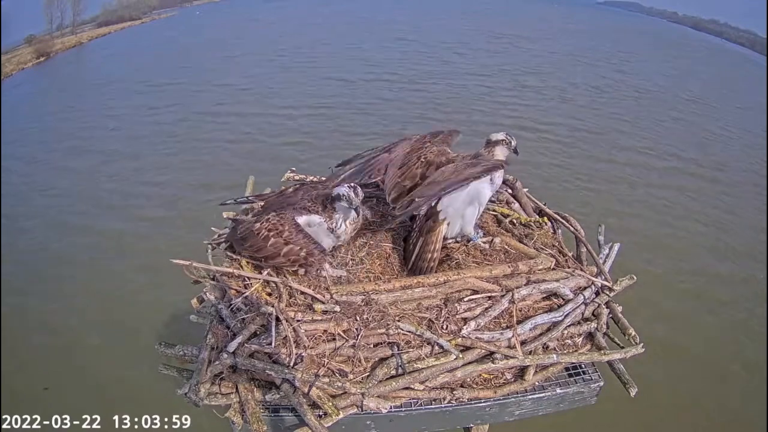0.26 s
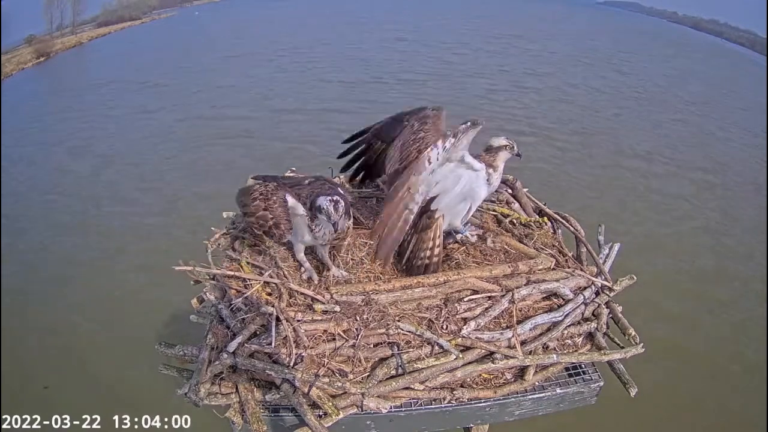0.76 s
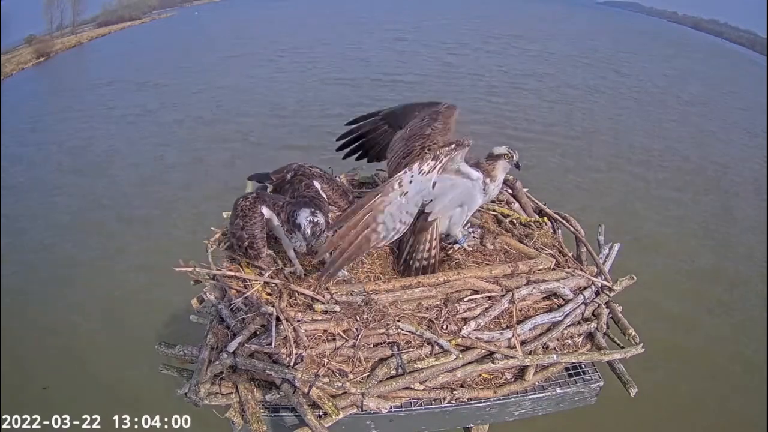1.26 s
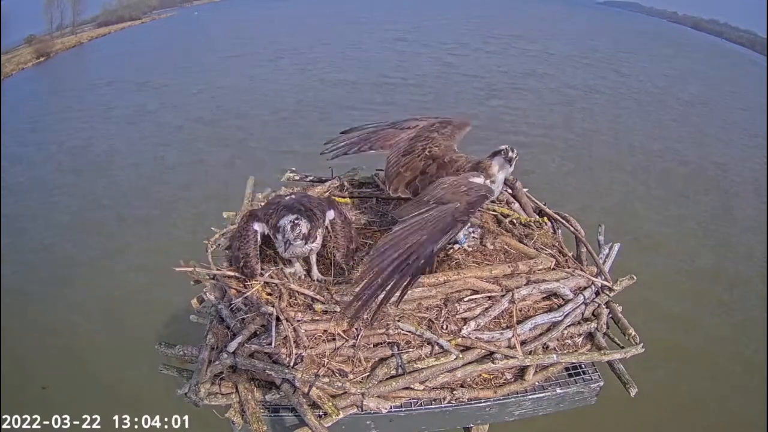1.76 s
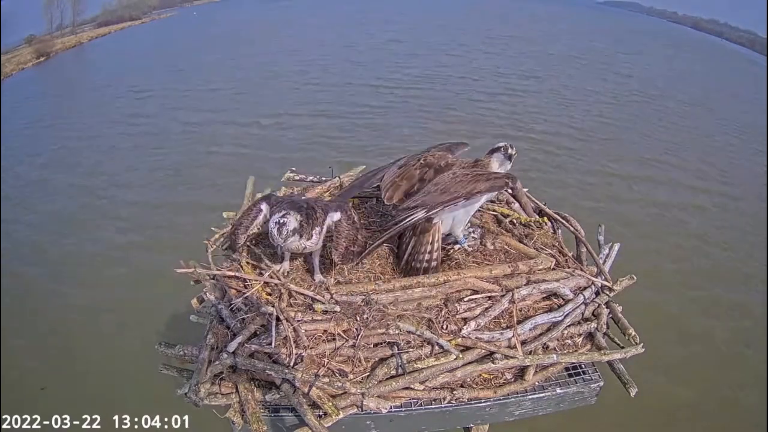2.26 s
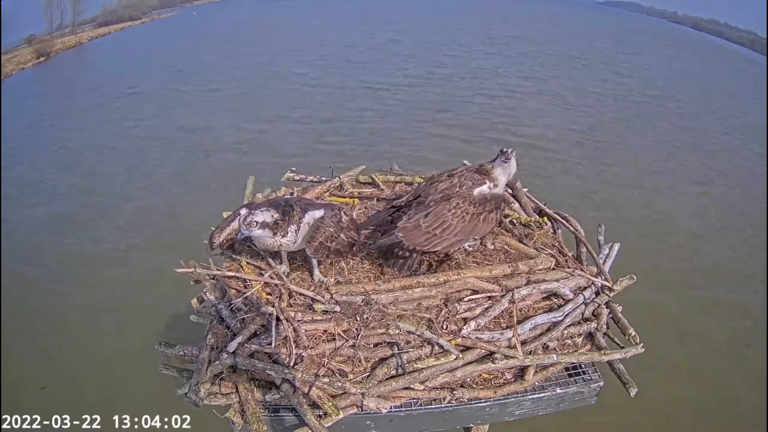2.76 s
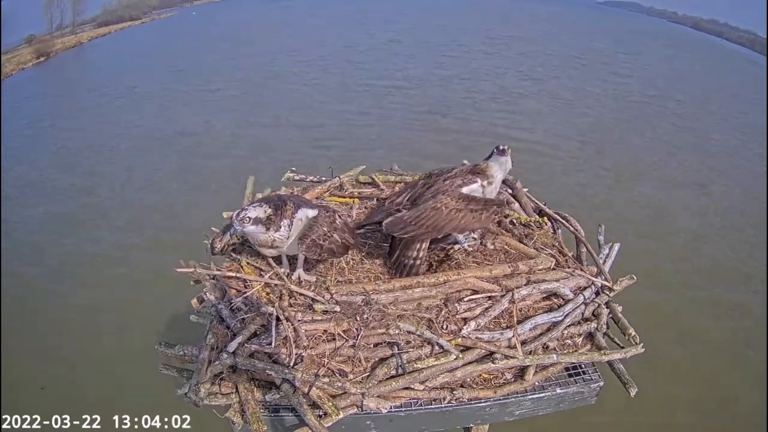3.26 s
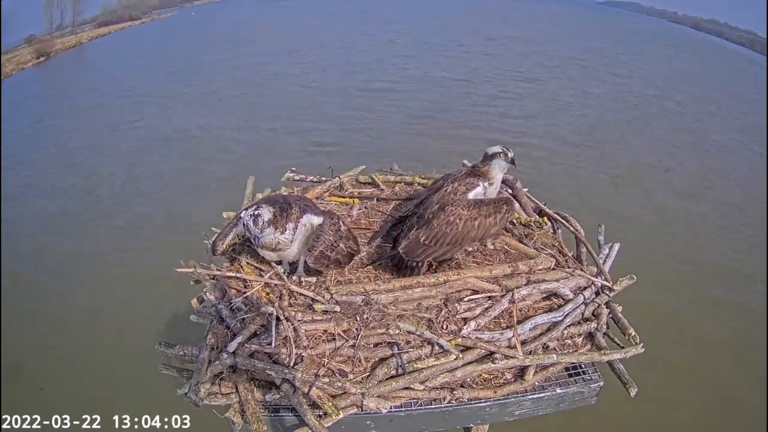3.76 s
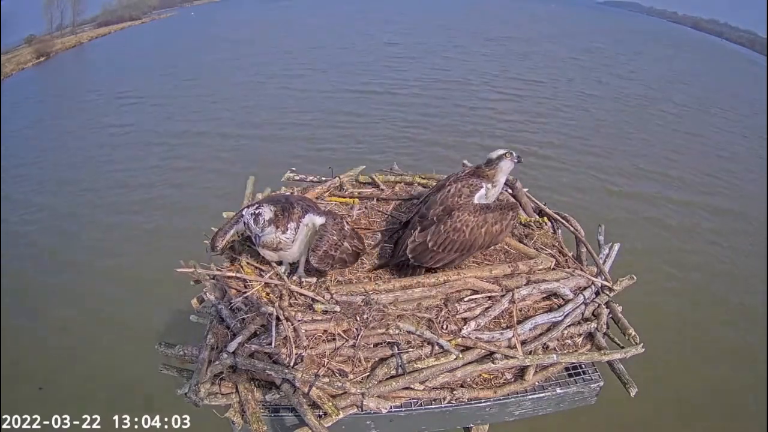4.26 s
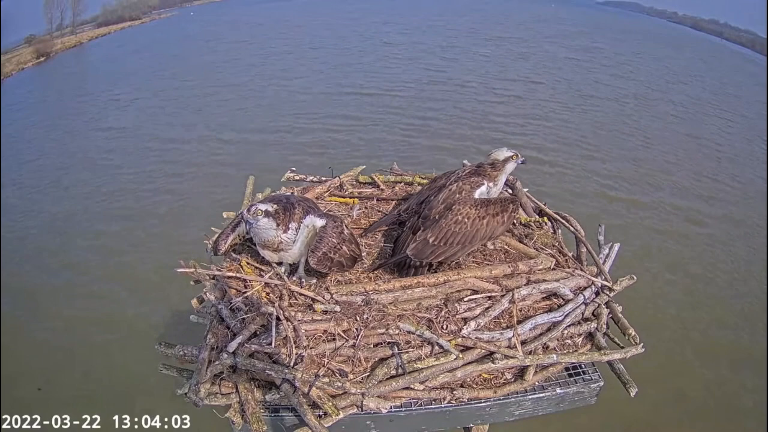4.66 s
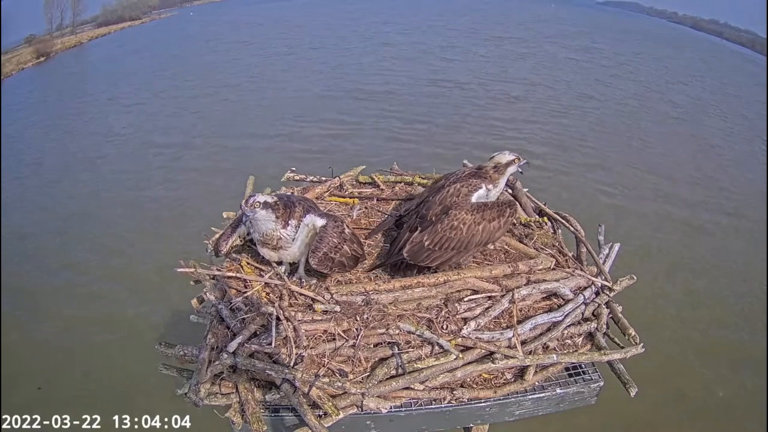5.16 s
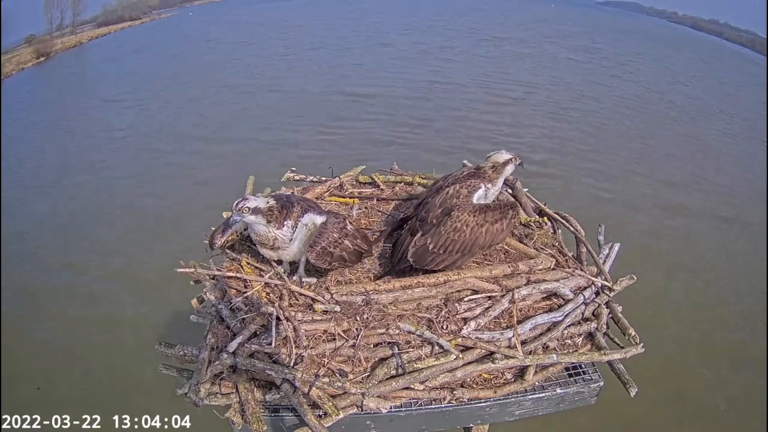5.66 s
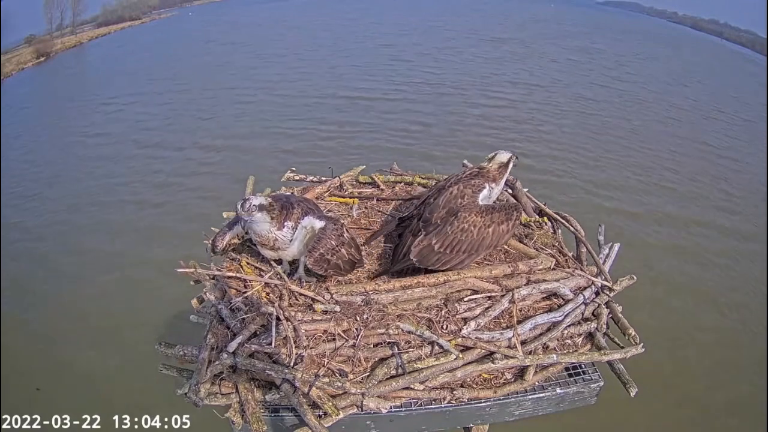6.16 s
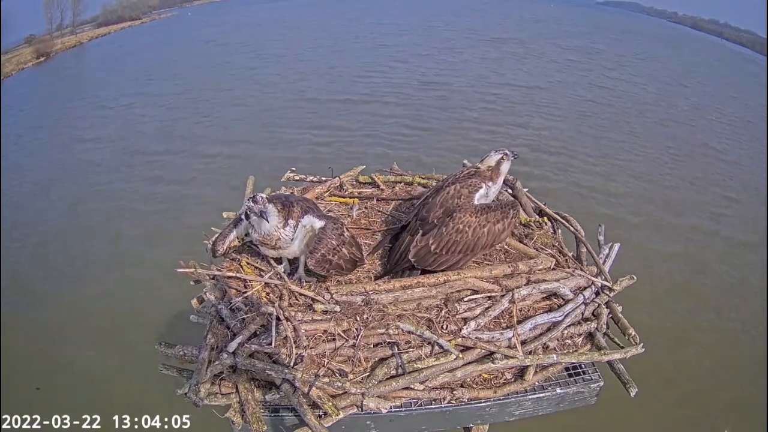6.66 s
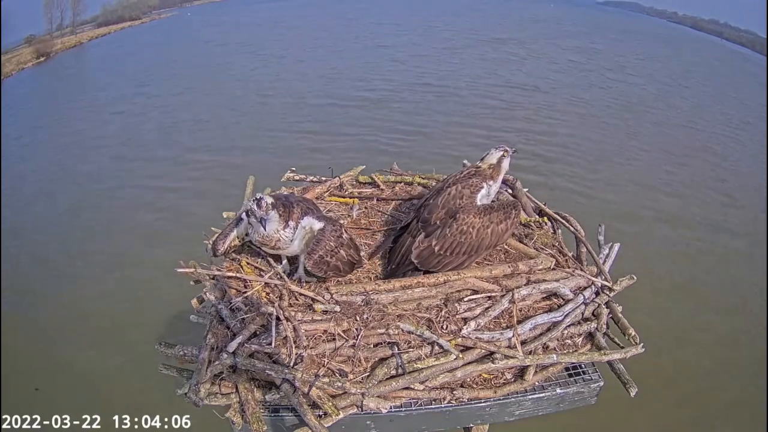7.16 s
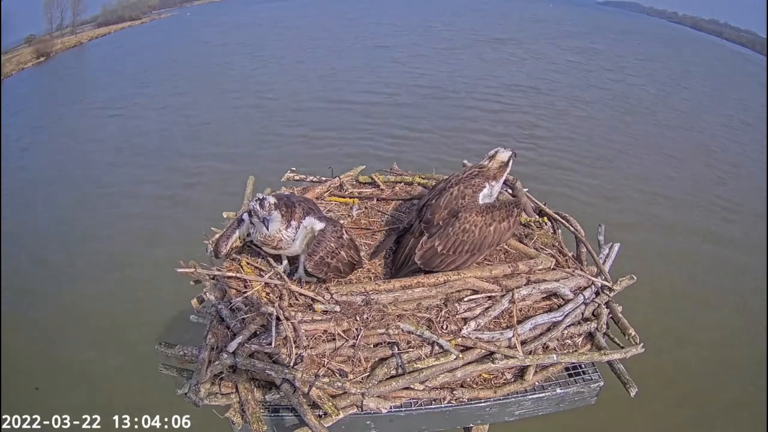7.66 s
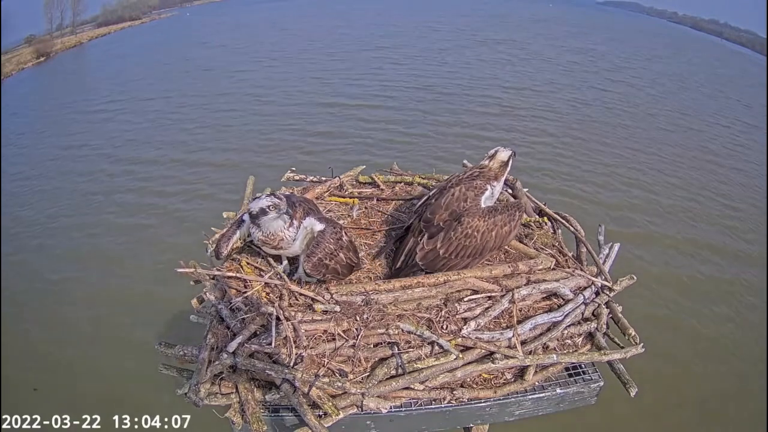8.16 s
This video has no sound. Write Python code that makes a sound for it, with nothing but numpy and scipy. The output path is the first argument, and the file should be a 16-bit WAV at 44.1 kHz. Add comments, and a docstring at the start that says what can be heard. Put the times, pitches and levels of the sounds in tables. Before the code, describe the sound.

Outdoors on a nest over open water, an osprey utters quick squeaky chips as wings brush and sticks knock. Short piercing calls follow, alternating falling yelps with flat whistles, each with a slight echo from nest and shore. Wind thuds directly on the close microphone throughout. Distant traffic, faint small birds and a steady electronic whine lie underneath.

```python
"""An osprey on a stick nest above a lake gives short chips, loud falling yelps and level whistles.
Its voice is built from gliding tones with an octave and rasp; nest, twigs, water and shore echo it.
Feathers brush and sticks click as bursts of noise; small birds far off are thin gliding tones.
Layered noise makes the wind and gusts at the microphone, over a distant traffic hush.
A faint electrical whine of steady tones runs throughout; anything beyond full scale clips."""
import sys
import numpy as np
from scipy import signal
from scipy.fft import rfft, irfft, next_fast_len
from scipy.io import wavfile
from scipy.ndimage import uniform_filter1d

SR = 44100
rng = np.random.default_rng(int(sys.argv[2]) if len(sys.argv) > 2 else 0)


def wav_out(sig):
    """Save sig, one row per channel (or a flat mono array), as 16-bit PCM at SR to the path in sys.argv[1]."""
    wavfile.write(sys.argv[1], SR, np.round(np.clip(np.atleast_2d(sig).T, -1, 1) * 32767).astype(np.int16))


N = 371322
T = np.arange(N) / SR  # time in seconds

# Wind eddies from large to small. Each row: pitch in Hz, relative level in dB,
# share from 0 to 1 that follows the small-eddy level.
EDDIES = [(15.2, 1.5, 0), (32, -0.5, 0), (64.03, 3.5, 0.42), (123.4, 2, 0.79), (235.6, -5.5, 0.96),
          (491, -19, 0.94), (1050, -32, 1), (1982, -40, 0.92)]
# Rumble of the large eddies, before the wind's trim. Each row: time in seconds, level in dB.
RUMBLE = [(0.03, -22.5), (0.8, -20.5), (0.97, -25.5), (2.2, -20.5), (2.95, -16.5), (3.7, -16),
          (4.41, -19.5), (4.9, -20.5), (5.2, -14), (5.48, -19), (5.8, -13), (6.0, -20.5), (6.2, -23.5),
          (6.35, -14), (6.6, -21.5), (7.15, -28.5), (7.38, -29.5), (7.5, -22), (7.8, -21), (8.2, -17.5),
          (8.4, -28)]
# Strength of the small eddies, before the wind's trim. Each row: time in seconds, level in dB.
TURBULENCE = [(0.04, -49.5), (0.53, -45), (1.99, -43.5), (2.39, -37.5), (2.9, -32), (3.53, -35),
              (3.72, -32.5), (4.21, -39), (4.58, -35.5), (5.32, -40.5), (5.7, -32), (5.82, -49),
              (6.09, -52), (6.47, -44), (7.26, -56.5), (8.4, -44.5)]
# Gusts. Each row: middle in seconds, length in seconds, level of their small eddies in dB.
GUSTS = [(2.78, 0.113, -30.5), (3.72, 0.078, -27.5), (4.55, 0.059, -29.5), (5.25, 0.1, -29.5),
         (5.345, 0.052, -23), (5.6, 0.27, -26.5), (5.79, 0.074, -25), (6.37, 0.1, -34),
         (6.505, 0.073, -31.5), (8.125, 0.048, -28.5), (8.26, 0.14, -36)]
# Colour of the distant road. Each row: frequency in Hz, relative level in dB per Hz.
TRAFFIC = [(200, -15.5), (500, -6), (680, -7), (880, 1.5), (1080, -3.5), (1330, -10), (1600, -8),
           (2100, -19), (2700, -24), (3500, -28.5), (4500, -31.5), (6700, -34.5), (7700, -51.5),
           (12800, -46), (14000, -68.5)]
# Swell of the road, before its flicker. Each row: time in seconds, level in dB.
TRAFFIC_LEVEL = [(0, -55), (1.1, -52.5), (2.3, -53), (5.8, -53), (6.4, -50), (6.75, -53.5), (7.15, -50.5),
                 (7.55, -52), (8.42, -53.5)]
# Tyres singing far away. Each row: time in seconds, pitch in Hz, level in dB.
TYRES = [(6.6, 991, -75.5), (6.9, 1023, -55.5), (7.15, 1092, -57), (7.35, 1170, -57), (7.7, 1100, -76)]
# Electrical whine. Each row: pitch in Hz, peak level in dB.
WHINE = [(915, -70), (1526, -65), (1930, -67.5), (2338, -66.5), (2434, -70), (2638, -74.5), (2837, -81),
         (3445, -76)]
# Colour of the feathers. Each row: frequency in Hz, relative level in dB per Hz.
FEATHER_COLOUR = [(800, -5.5), (2000, 1), (3000, -4.5), (4000, 0), (4800, -5), (6300, -2.5), (7100, -5.5),
                  (7900, -34)]
# Wing strokes, and one faint, long hush of noise at 3.25 s. Each row: middle in seconds, # length in seconds,
# level in dB.
WING_STROKES = [(0.44, .06, -66), (0.858, 0.019, -65), (2.003, 0.05, -49.5), (2.09, 0.046, -63),
                (2.25, 0.045, -64.5), (3.25, .3, -68.5)]
# Short chips, levels before colouring and the call trim. Each row: start in seconds, length in seconds,
# pitch in Hz, opening overshoot in Hz, level in dB, octave in dB relative to the note,
# opening squeak in dB, lead of the squeak in seconds, growth of the octave in dB, sag in Hz per second.
CHIPS = [(0.2226, 0.022, 2904, -250, -23.5, -5.5, -28.5, 0.0045, 16, 14000),
         (1.1362, 0.018, 2700, -250, -21.5, -2.5, -30, 0.0024, -5.5, 10500),
         (1.4345, 0.025, 2960, 117, -21, -2, -24, 0.0074, 13, 15000),
         (1.7306, 0.024, 2865, 121.5, -23, .5, -22, .006, 9.5, 13950),
         (7.172, 0.027, 2087, 399, -29, -36, -72, 0.0015, -35, 10550)]
# Falling yelps, levels before colouring and the call trim. Each row: start in seconds, length in seconds,
# lowest pitch in Hz, closing pitch in Hz, level in dB, fading in dB per second,
# octave in dB relative, rasp in dB relative, lag of the nest's reflection in seconds.
YELPS = [(2.7398, 0.099, 2515, 2894, -3.5, 145, -10.5, -30.5, .00211),
         (5.174, 0.099, 2676, 4770, -12, 106, -12.5, -29, .00262)]
# Level whistles, levels before colouring and the call trim. Each row: start in seconds, length in seconds,
# top pitch in Hz, level in dB, octave in dB relative, opening squeak in dB,
# rasp in dB relative, in-between lines in dB relative.
WHISTLES = [(4.0312, 0.1, 2968, -16, -5, -25, -28, -36.5), (6.337, 0.095, 3155, -17.5, -8, -32, -42, -33.5)]
# Peaks and dips each partial glides through on its way to the microphone.
# Each row: frequency in Hz, gain in dB.
CALL_COLOUR = [(1900, -6), (2540, 0), (2720, -0.5), (2950, 4.5), (3130, -3), (3550, 8), (3730, 2),
               (3950, 5.5), (4400, 0), (4950, -10), (5250, -2), (5500, -4), (5780, 1.5), (5930, -12),
               (6270, 9), (7500, -16.5)]
# The wide-open beak of a yelp. Each row: frequency in Hz, gain in dB.
YELP_COLOUR = [(2500, -1), (3000, 0.5), (3900, 3.5), (5400, -4), (6300, 3), (7200, 0.5), (7900, -15)]
# Distinct echoes from the banks. Each row: delay in seconds, gain in dB before the far resonance.
BANK_ECHOES = [(.097, -49), (.265, -64), (.366, -57), (.447, -61.5), (.7, -67)]
# Thin notes of small birds far off. Each row: start in seconds, length in seconds,
# first pitch in Hz, last pitch in Hz, level in dB.
SMALL_BIRDS = [(0.746, .11, 3230, 3170, -68), (3.61, .05, 5200, 5460, -74.5),
               (3.717, 0.067, 5000, 4780, -72.5), (3.775, .07, 4760, 4950, -72),
               (3.845, 0.066, 5200, 5330, -71.5), (3.851, .085, 4800, 4900, -75.5),
               (3.954, 0.099, 5330, 5030, -74), (4.44, .1, 4860, 4900, -79.5)]
# Sticks shifting under the bird. Each row: start in seconds, level in dB, pitch in Hz, length in seconds.
STICKS = [(1.05, -57, 2593, 0.0154), (1.636, -44.5, 1740, 0.0044), (1.964, -59, 2950, 0.012),
          (1.987, -48, 1700, 0.012), (2.0, -42.5, 900, 0.0045), (2.0, -41, 1550, 0.007),
          (2.015, -41, 1600, 0.0064), (2.022, -45, 1750, .005), (2.03, -59, 2900, 0.0207),
          (2.081, -57, 1900, 0.011), (3.362, -59, 3000, 0.0067), (3.612, -62, 2900, 0.0052),
          (5.011, -65, 4000, .004), (5.591, -53.5, 2930, 0.006), (5.591, -54, 5600, 0.0033),
          (5.725, -54.5, 2400, .014), (6.07, -61, 4300, .01), (6.162, -67, 6000, 0.0065),
          (6.83, -58, 2230, 0.022), (7.89, -68, 4400, 0.03), (8.365, -62.5, 6300, 0.0042)]
# Single eddies striking the microphone. Each row: start in seconds, level in dB, pitch in Hz,
# length in seconds.
BUFFETS = [(3.028, -39, 515, 0.0041), (3.132, -42, 516, 0.0088), (3.238, -39, 500, 0.0049),
           (3.397, -35, 519, 0.0072), (3.48, -38, 505, 0.0092), (3.665, -34.5, 235, 0.036),
           (5.533, -39.5, 456, 0.031), (6.482, -42, 170, 0.0049), (6.53, -36, 199, 0.014),
           (6.778, -19.5, 73, 0.019), (6.93, -25.5, 73, 0.028), (7.445, -16.5, 40, 0.028),
           (8.119, -39, 404, 0.0093), (8.286, -40, 393, 0.0043)]
# The last whistle echoing from far across the lake. Each row: time in seconds, pitch in Hz, level in dB.
FAR_WHISTLE = [(6.45, 3100, -73), (6.53, 3130, -69), (6.7, 3140, -74.5), (6.88, 3060, -67.5),
               (7.0, 3090, -73.5), (7.1, 3090, -83)]

GUST_RUMBLE_DB = 12.5  # how much stronger a gust's rumble is than its small eddies
MIC_LIMIT = .7  # largest wind swing, as a share of full scale
RUSTLE_DB, WINGS_FOLDED_S = -63.5, 2.42
# the high voice that opens a note: first pitch, sag, time for that sag
SQUEAK_HZ, SQUEAK_SAG_HZ, SQUEAK_SAG_S = 4080, 610, 0.0089
SQUEAK_OVERLAP = 1.32  # the squeak sounds on into the note for this many times its lead
CLICK_HZ, CLICK_S = 1800, 0.00098  # the pop with which the airway opens, and its decay
SPIT_S = .0025  # decay of the puff of air that escapes with the pop
CHIP_SETTLE_S = 0.002
YELP_TURN_S, YELP_FALL, YELP_BEND = .072, 0.74, 1.4  # the fall is a share of the lowest pitch
YELP_FLICK, YELP_FLICK_S = .9, 0.0057  # share of the lowest pitch, decay
YELP_REFLECTION = .55  # share that the nest throws back, inverted
# scoop, arch and droop are shares of the top pitch
WHISTLE_TOP_S, WHISTLE_ARCH = 0.039, 0.028
WHISTLE_SCOOP, WHISTLE_SCOOP_S = 0.054, 0.0068
WHISTLE_DROOP, WHISTLE_DROOP_S = 0.14, 0.01
WHISTLE_SQUEAK_LEAD_S = 0.0035
DEVICE_HZ, DEVICE_RATE_HZ = 7600, 16000  # upper limit for the nest's sounds; low sample rate
TOP_HZ = 15600  # upper limit of the whole mix


def undb(db):
    """Turn decibels into gain."""
    return 10 ** (np.asarray(db) / 20)


def unit(x):
    """Scale to an rms of 1."""
    return x / np.sqrt(np.mean(x ** 2) + 1e-20)


def curves(rows, t=T):
    """Join each column of a table by straight lines along its first column."""
    places, *columns = np.transpose(sorted(map(tuple, rows)))
    return [np.interp(t, places, column) for column in columns]


def smooth(x, seconds):
    """Take two running means in a row."""
    size = max(1, int(seconds * SR))
    return uniform_filter1d(uniform_filter1d(x, size), size)


def noise(points):
    """Make noise of rms 1 with the colour of (Hz, dB) points."""
    hz, db = np.transpose(points)
    size = next_fast_len(N)
    f = np.maximum(np.fft.rfftfreq(size, 1 / SR), 1)
    gain = undb(np.interp(np.log(f), np.log(hz), db))
    spectrum = rfft(rng.standard_normal(size)) * gain
    return unit(irfft(spectrum, size)[:N])


def walk(rate, size=N):
    """Wander smoothly by chance with an rms of 1, using rate random points a second."""
    steps = rng.standard_normal(int(N / SR * rate) + 2)
    path = np.interp(T[:size] * rate, np.arange(len(steps)), steps)
    return unit(smooth(path, .5 / rate))


def wavering_tone(hz, width_hz):
    """Blur a gliding tone of rms about 1 by letting its strength wander."""
    return np.sqrt(2) * walk(2 * width_hz) * np.sin(2 * np.pi * np.cumsum(hz) / SR)


def resonance(x, hz, q):
    """Ring at one pitch; a higher q rings longer."""
    return signal.lfilter(*signal.iirpeak(hz, q, fs=SR), x)


def swells(rows):
    """Gain of brief rounded swells, from (middle s, length s, dB) rows."""
    return sum(undb(db) * np.exp(-(2 * (T - s) / length) ** 2) for s, length, db in rows)


def bursts(table, q):
    """Short rushes of noise, each swelling quickly and dying in a broad resonance."""
    out = np.zeros(N)
    for s, db, hz, length in table:
        age = np.maximum(T - s, 0) / (length / 2)
        grain = unit(resonance(resonance(rng.standard_normal(N), hz, q), hz, q))
        out += undb(db) * age * np.exp(1 - age) * grain
    return out


def envelope(age, length, attack_s, release_s):
    """Rounded attack, hold and release."""
    attack = np.sin(np.pi / 2 * np.clip(age / attack_s, 0, 1))
    release = np.sin(np.pi / 2 * np.clip((length - age) / release_s, 0, 1))
    return attack * release


def ages(length):
    """Seconds since the start of a note."""
    return np.arange(int(length * SR)) / SR


def wind(rumble_db=3, eddies_db=3, coupling=0.45, gustiness=0.29):
    """A cascade of eddies: each size breaks into smaller ones, most at its own pressure peaks."""
    gusts = swells(GUSTS)
    rumble = undb(curves(RUMBLE)[0] + rumble_db)
    turbulence = undb(curves(TURBULENCE)[0] + eddies_db)
    large_db = 20 * np.log10(np.hypot(rumble, undb(GUST_RUMBLE_DB) * gusts))
    small_db = 20 * np.log10(np.hypot(turbulence, gusts))
    puffs = np.exp(gustiness * walk(25))
    out, parent = 0, np.zeros(N)
    for hz, db, share in EDDIES:
        octave = noise([(hz / 3, -30), (hz / 1.5, 1), (hz, 0), (hz * 1.4, -4), (hz * 3, -32), (hz * 30, -150)])
        eddy = octave * puffs * np.sqrt(1 + coupling * parent ** 2)
        # even out slow changes, so that the level curves and gusts set them
        parent = eddy / np.sqrt(smooth(eddy ** 2, 0.093))
        level_db = db + (1 - share) * large_db + share * small_db
        out = out + undb(level_db) * parent
    # the microphone rounds off the strongest pushes
    return out / (1 + (out / MIC_LIMIT) ** 4) ** (1 / 4)


def traffic(flicker_db=2.0, tyre_width_hz=70):
    """A far road hushes across the water; one vehicle's tyres sing as it passes."""
    road_db, = curves(TRAFFIC_LEVEL)
    hz, tyre_db = curves(TYRES)
    song = undb(tyre_db) * wavering_tone(hz, tyre_width_hz)
    hush = undb(road_db + flicker_db * walk(3.2)) * noise(TRAFFIC)
    return hush + song


def whine():
    """Thin tones from the device's electronics, steady but for a slight wander in phase."""
    return sum(undb(db) * np.sin(2 * np.pi * hz * T + 0.66 * walk(36)) for hz, db in WHINE)


def feathers(grain_db=2.5, restless_db=2.5, fade_s=0.071):
    """Vanes brush over each other in fine grains, louder at each stroke; the rustle fades once wings fold."""
    fade = np.exp(-np.maximum(T - WINGS_FOLDED_S, 0) / fade_s)
    moving = fade * undb(RUSTLE_DB + restless_db * walk(14))
    grains = unit(undb(grain_db * walk(250)))
    return (moving + swells(WING_STROKES)) * grains * noise(FEATHER_COLOUR)


def osprey():
    """Chips, whistles and yelps, each carrying a little rasp of breathy noise."""
    rasp = noise([(900, -43.5), (1700, -0.5), (2800, 0.5), (4200, -3.0), (6800, -4.0), (8000, -33.0)])
    chips = sum(chip(*row) for row in CHIPS)
    yelps = sum(yelp(*row) for row in YELPS)
    whistles = sum(whistle(*row) for row in WHISTLES)
    tone, air = chips + yelps + whistles
    return tone + air * rasp


def syrinx(s, hz, effort, octave_db, rasp_db, thirds_db, fold_db, jitter, flutter=0.25, colour=CALL_COLOUR):
    """The bird's voice box whistles a gliding tone with its octave; returns tone and rasp strength."""
    size, start = len(hz), int(s * SR)
    phase = 2 * np.pi * np.cumsum(hz * (1 + jitter * walk(399.77, size))) / SR
    first_db, second_db = (curves(colour, k * hz)[0] for k in (1, 2))
    tone = undb(first_db) * np.sin(phase) + undb(second_db + octave_db) * np.sin(2 * phase)
    # every third cycle differs a little, which puts faint, unsteady lines between the harmonics
    for k in (2, 4, 5):
        strength = 1 + .5 * walk(200, size)
        tone += undb(thirds_db) * strength * np.sin(k * phase / 3 + .9 * walk(500, size))
    # the device's low sample rate folds the third harmonic back down
    folded = np.sin(2 * np.pi * DEVICE_RATE_HZ * T[:size] - 3 * phase)
    near_fold = np.exp(-((3 * hz - DEVICE_RATE_HZ / 2) / 1500) ** 2)
    tone += undb(fold_db) * folded * near_fold
    out = np.zeros((2, N))
    out[0, start:start + size] = np.sqrt(2) * effort * tone * (1 + flutter * walk(300, size))
    out[1, start:start + size] = effort * undb(rasp_db)
    return out


def squeak(s, db, lead_s, note_hz, sum_db=-11, click_db=-5, spit_db=-7):
    """A pop and a puff of air, then a sagging high voice that beats with the note and makes a sum tone."""
    length = lead_s * (1 + SQUEAK_OVERLAP)
    age = ages(length)
    hz = SQUEAK_HZ - SQUEAK_SAG_HZ * (age / SQUEAK_SAG_S) ** 1.6
    effort = undb(db) * envelope(age, length, attack_s=0.0026, release_s=0.0068)
    out = syrinx(s - lead_s, hz, effort, octave_db=-10.5, rasp_db=-16.5, thirds_db=-30.5,
                 fold_db=-41.0, jitter=0.012)
    sum_swell = effort * undb(sum_db) * np.sin(np.pi * age / length)
    sum_tone = sum_swell * np.sin(2 * np.pi * np.cumsum(hz + note_hz) / SR)
    click = undb(db + click_db) * np.exp(-age / CLICK_S) * np.sin(2 * np.pi * CLICK_HZ * age)
    start = int((s - lead_s) * SR)
    out[0, start:start + len(age)] += np.sqrt(2) * (sum_tone + click)
    out[1, start:start + len(age)] += undb(db + spit_db) * np.exp(-age / SPIT_S)
    return out


def chip(s, length, hz, overshoot_hz, db, octave_db, squeak_db, lead_s, growth_db, sag_hz_per_s):
    """A squeak, then a short note that settles and sags evenly while its octave grows or fades."""
    age = ages(length)
    pitch = hz + overshoot_hz * np.exp(-age / CHIP_SETTLE_S) - sag_hz_per_s * age
    effort = undb(db) * envelope(age, length, attack_s=0.00083, release_s=0.0097)
    brightening_db = growth_db * (age / length - .5)
    note = syrinx(s, pitch, effort, octave_db + brightening_db, rasp_db=-31.5, thirds_db=-35,
                  fold_db=-34, jitter=0.011, flutter=0.22)
    return squeak(s, squeak_db, lead_s, hz) + note


def lakeside(x, nest_db=-19, water_db=-27, twigs_db=-27, twig_ring_db=-23, shore_db=-51,
             water_hz=2800, far_hz=3250):
    """Nest, then water reflect the sound; twigs scatter it; the banks return echoes in a faint smear."""
    nest_s, water_s, shore_s = .0031, .029, .42  # delays
    twigs_t60 = .19  # seconds for the twigs' scatter to fall 60 dB
    t = T[:SR]
    scatter = rng.standard_normal((3, SR)) / np.sqrt(SR)
    dying = unit(undb(-60 * t / twigs_t60))
    twig_ring = undb(twig_ring_db) * resonance(scatter[2], 3550, q=3)
    near = dying * (undb(twigs_db) * scatter[0] + twig_ring)
    near[0] += 1  # the direct sound
    near[int(nest_s * SR)] += undb(nest_db)
    water = undb(water_db) * (np.arange(SR) == int(water_s * SR))
    far = undb(shore_db) * unit(np.exp(-abs(t - shore_s) / .2)) * scatter[1]
    for delay, db in BANK_ECHOES:
        far[int(delay * SR)] += undb(db)
    # ripples and distance take the top off the far echoes
    echoes = near + resonance(water, water_hz, q=4) + resonance(far, far_hz, q=2.6)
    return signal.fftconvolve(x, echoes)[:N]


def small_birds(waver=.006):
    """Thin, wavering glides from the far bank."""
    out = np.zeros(N)
    for s, length, first_hz, last_hz, db in SMALL_BIRDS:
        age, start = ages(length), int(s * SR)
        hz = np.linspace(first_hz, last_hz, len(age)) * (1 + waver * walk(70, len(age)))
        loudness = undb(db) * np.sqrt(2) * envelope(age, length, attack_s=.02, release_s=.025)
        out[start:start + len(age)] += loudness * np.sin(2 * np.pi * np.cumsum(hz) / SR)
    return out


def sticks():
    """Shifting sticks knock and scrape as short, resonant bursts of noise."""
    return bursts(STICKS, q=4.9)


def yelp(s, length, low_hz, closing_hz, db, fade_db_per_s, octave_db, rasp_db, lag_s):
    """A loud note flicks down from very high, slides to its lowest pitch and turns up as it fades."""
    age = ages(length)
    flick = YELP_FLICK * np.exp(-age / YELP_FLICK_S)
    fall = YELP_FALL * np.maximum(1 - age / YELP_TURN_S, 0) ** YELP_BEND
    upturn = (np.maximum(age - YELP_TURN_S, 0) / (length - YELP_TURN_S)) ** 2
    pitch = low_hz * (1 + flick + fall) + (closing_hz - low_hz) * upturn
    effort = undb(db - fade_db_per_s * age) * envelope(age, length, attack_s=0.016, release_s=0.024)
    note = syrinx(s, pitch, effort, octave_db, rasp_db, thirds_db=-55.5, fold_db=-51.5,
                  jitter=0.0067, flutter=0.1, colour=YELP_COLOUR)
    # beating with its reflection breaks the glide into steps
    reflection = np.array([np.interp(T - lag_s, T, part) for part in note])
    return note - YELP_REFLECTION * reflection


def buffets():
    """Single eddies strike the microphone as dull, broad bursts of noise."""
    return bursts(BUFFETS, q=1.9)


def whistle(s, length, hz, db, octave_db, squeak_db, rasp_db, thirds_db):
    """A squeak, then a held note that scoops up, arches gently and droops as the air runs out."""
    age = ages(length)
    scoop = WHISTLE_SCOOP * np.exp(-age / WHISTLE_SCOOP_S)
    arch = WHISTLE_ARCH * ((age - WHISTLE_TOP_S) / (length - WHISTLE_TOP_S)) ** 2
    droop = WHISTLE_DROOP * np.exp((age - length) / WHISTLE_DROOP_S)
    pitch = hz * (1 - scoop - arch - droop)
    weak_db = 12 * np.exp(-age / 0.019)  # the fundamental swells after the octave and the buzz
    effort = undb(db - weak_db) * envelope(age, length, attack_s=0.0027, release_s=0.012)
    note = syrinx(s, pitch, effort, octave_db + weak_db, rasp_db + weak_db, thirds_db + weak_db,
                  fold_db=-41.0, jitter=0.0007, flutter=0.055)
    return squeak(s, squeak_db, WHISTLE_SQUEAK_LEAD_S, hz) + note


def far_whistle(width_hz=30):
    """A thin echoed note, blurred by the distance."""
    hz, db = curves(FAR_WHISTLE)
    sounding = (T > FAR_WHISTLE[0][0]) & (T < FAR_WHISTLE[-1][0])
    return sounding * undb(db) * wavering_tone(hz, width_hz)


def scene(call_db=-1.75):
    """Add up everything that reaches the one microphone."""
    nest = lakeside(undb(call_db) * osprey()) + sticks() + feathers()
    # the device passes little above the calls' second harmonic
    nest = signal.sosfilt(signal.butter(24, DEVICE_HZ, fs=SR, output="sos"), nest)
    air = wind() + buffets()
    distance = far_whistle() + small_birds() + traffic()
    return (nest + air + distance + whine())[None]


def record(dry):
    """Clip whatever exceeds full scale, then cut the very top of the treble."""
    clipped = np.clip(dry, -1, 1)
    return signal.sosfilt(signal.ellip(8, .2, 70, TOP_HZ, fs=SR, output="sos"), clipped)


dry = scene()
out = record(dry)
wav_out(out)
```